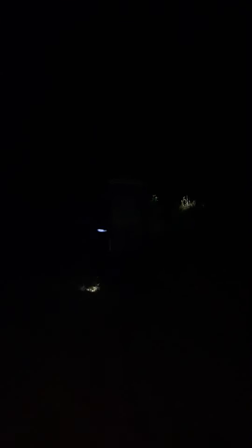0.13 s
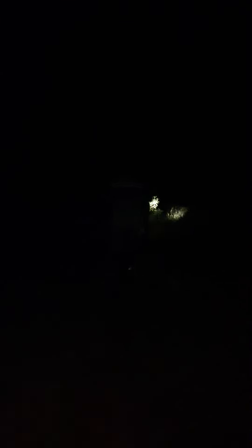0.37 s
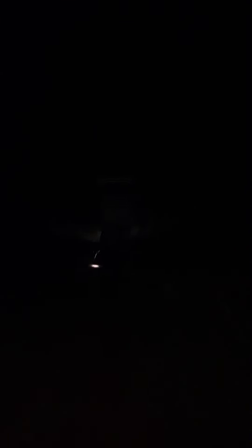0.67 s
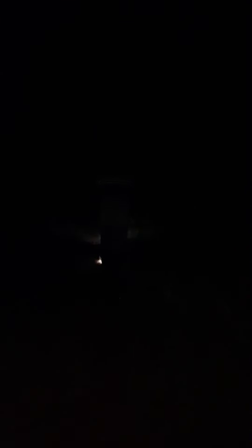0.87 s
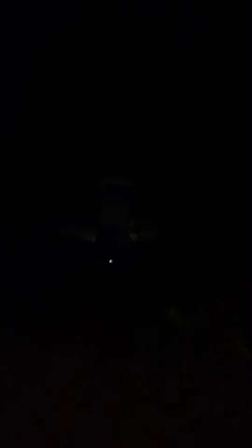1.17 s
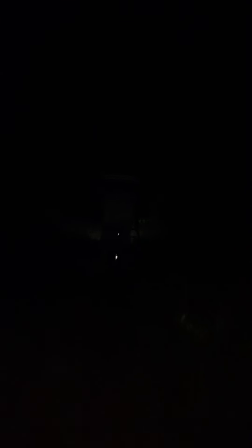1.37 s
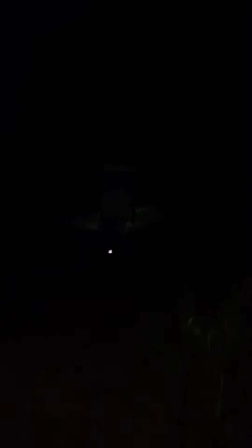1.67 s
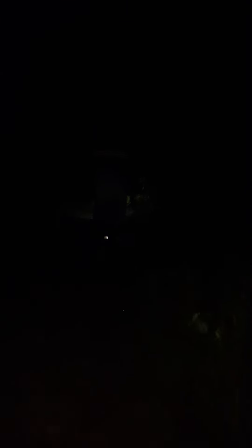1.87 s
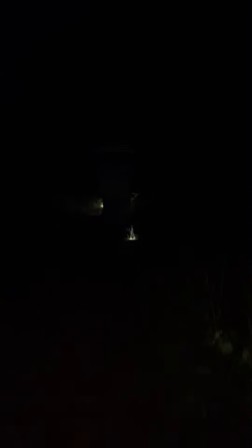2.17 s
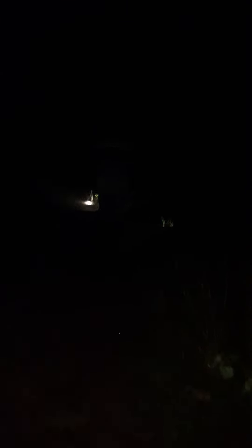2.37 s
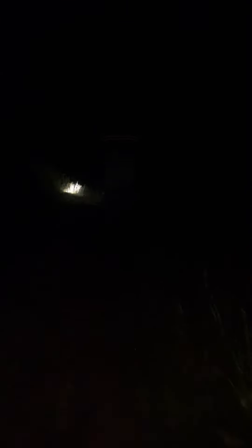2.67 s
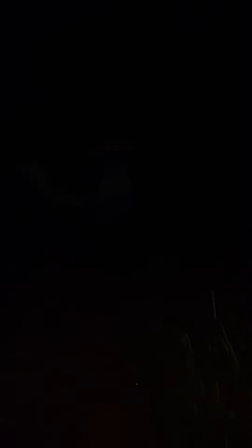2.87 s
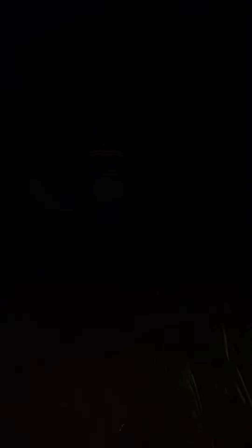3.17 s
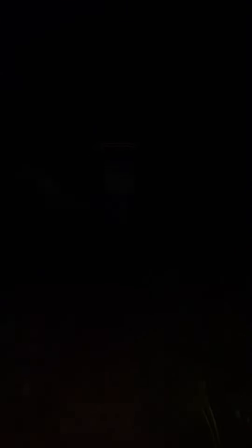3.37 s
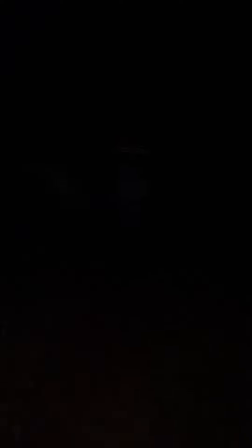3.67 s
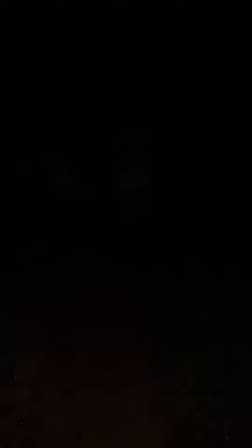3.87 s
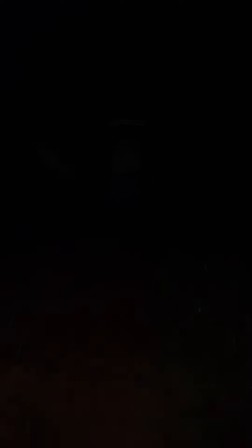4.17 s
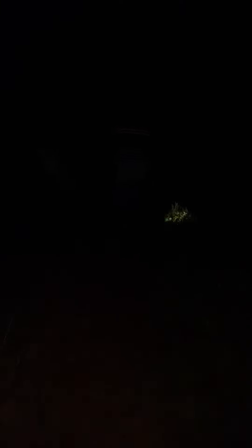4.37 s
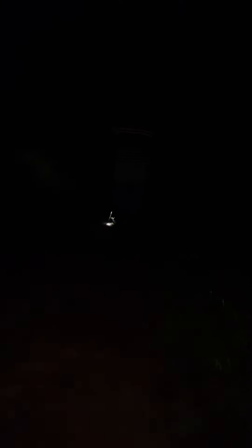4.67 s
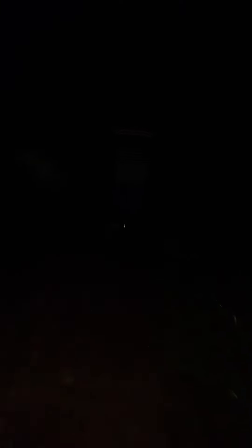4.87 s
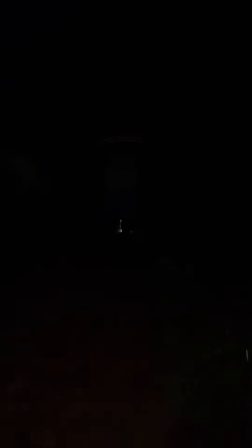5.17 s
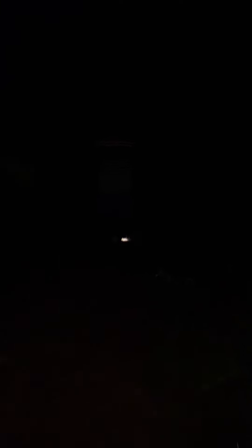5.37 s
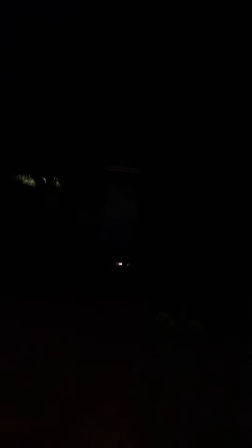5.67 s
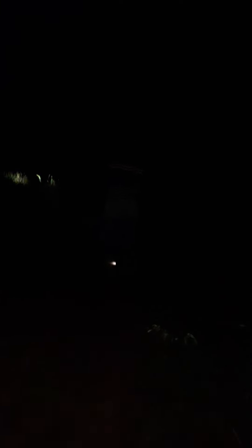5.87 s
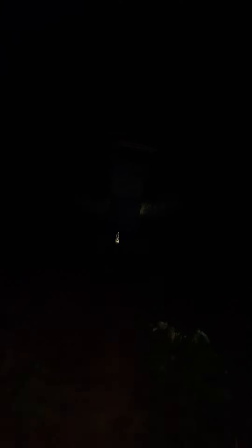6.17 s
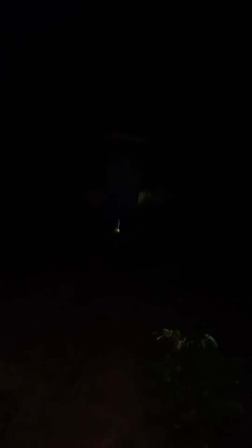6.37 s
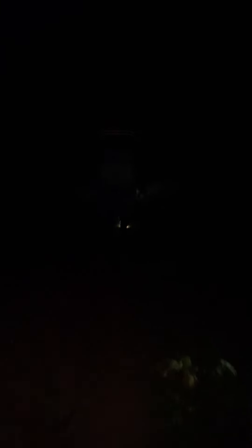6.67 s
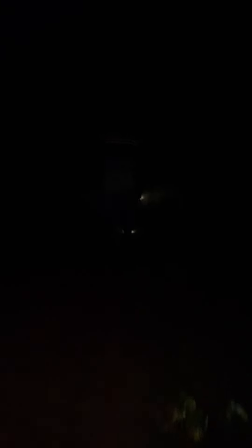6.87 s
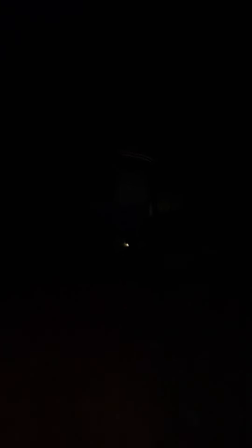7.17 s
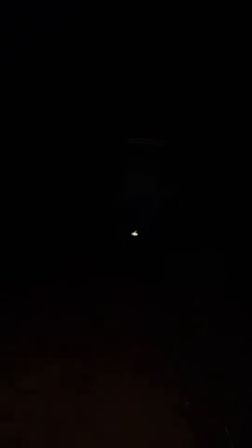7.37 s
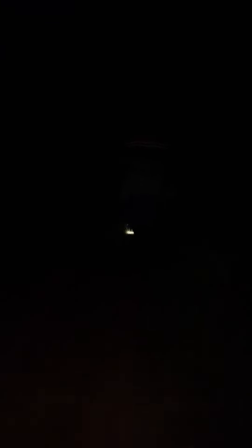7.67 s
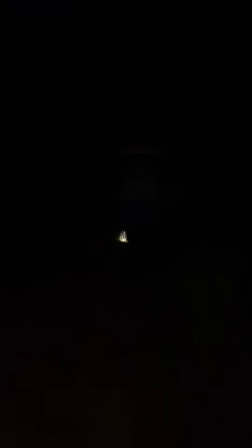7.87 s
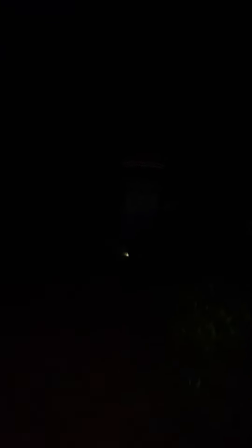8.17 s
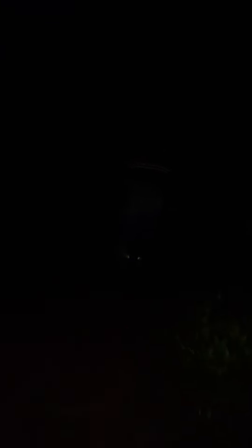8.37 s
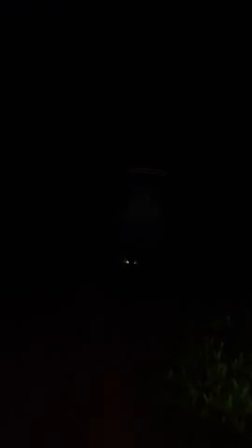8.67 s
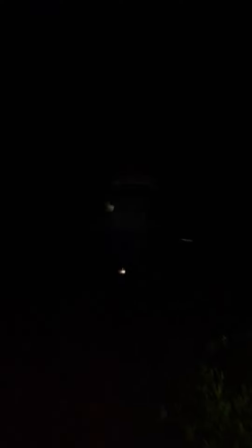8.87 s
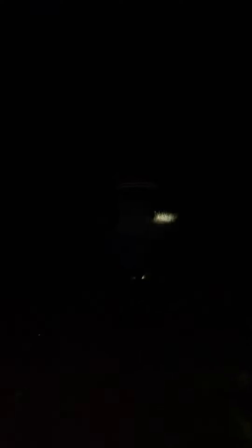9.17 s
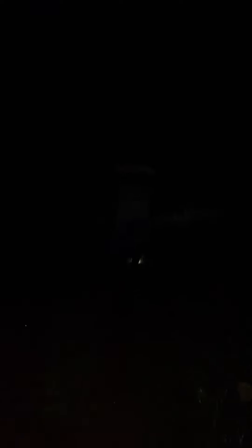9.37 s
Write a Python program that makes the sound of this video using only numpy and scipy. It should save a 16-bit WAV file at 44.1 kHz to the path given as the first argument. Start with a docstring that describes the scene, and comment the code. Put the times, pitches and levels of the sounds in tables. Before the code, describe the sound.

A higher and a lower cricket-like insect answer each other on a dark bush path, fading gradually as a walker's soles slap and thud.

```python
"""Night on a bush path: from the start there is a hush, far trills and, to the right, a buzzy chirp half done.
A second, lower insect answers at once, and the two trade rising chirps; each is a run of ringing wing strokes.
Soon soles slap, a faint far drone drifts in (three times in all), heels thud and grit crunches in noise sprays.
As the walker goes on, the callers fall back: first the higher one sinks, later the lower one too.
The hush and trills are shaped noise, the drone a few sine waves; leaves scatter the chirps and footsteps."""
import sys
import numpy as np
from scipy import signal
from scipy.fft import rfft, irfft
from scipy.io import wavfile
from scipy.ndimage import uniform_filter1d

SR = 44100
rng = np.random.default_rng(int(sys.argv[2]) if len(sys.argv) > 2 else 0)


def materialize(psi):
    """Save the field psi as 16-bit PCM at rate SR to the path in sys.argv[1].

    A 1-D psi becomes a single channel; in a 2-D psi each row is a channel.
    """
    bounded = np.clip(np.atleast_2d(psi).T, -1, 1)
    quanta = np.round(bounded * 32767).astype(np.int16)
    wavfile.write(sys.argv[1], SR, quanta)


N = 420261
TIME = np.arange(N) / SR


def undb(db):
    """Turn decibels into a gain."""
    return 10 ** (np.asarray(db) / 20)


def unit(x):
    """Scale a sound to an average strength (rms) of 1."""
    return x / np.sqrt(np.mean(x ** 2) + 1e-18)


def on_log_axis(rows, hz):
    """Read a table of (f/Hz, value) between its rows, on a log-frequency axis."""
    points, values = np.transpose(rows)
    return np.interp(np.log(hz + 1), np.log(points), values)


def walk(rate):
    """A smooth random wander with a spread near 1; a higher rate (Hz) wanders faster."""
    k = int(SR / rate)
    steps = np.repeat(rng.standard_normal(N // k + 1), k)
    return 1.43 * uniform_filter1d(uniform_filter1d(steps, k), k)[:N]


def pan(db):
    """Left and right gains for a level difference, at constant power; below 0 dB leans right."""
    gains = undb(np.array([[.5], [-.5]]) * db)
    return gains / np.sqrt(np.mean(gains ** 2, axis=0))


def two_ears(shared, opposed, likeness):
    """Mix two noises into left and right; likeness is 1 for the same, 0 for unrelated, -1 for opposite."""
    return shared * np.sqrt(1 + likeness) + opposed * np.sqrt(1 - likeness) * np.array([[1], [-1]])


def add(track, s, sound):
    """Mix a sound into a track at a time in seconds, cutting what falls outside."""
    i = int(s * SR)
    lo, hi = max(i, 0), min(i + sound.shape[-1], N)
    if hi > lo:
        track[..., lo:hi] += sound[..., lo - i:hi - i]


def burst(lo_hz, hi_hz, t, decay_s):
    """A puff of noise between two pitches that dies away."""
    band = signal.butter(2, [lo_hz, hi_hz], "band", fs=SR, output="sos")
    return unit(signal.sosfilt(band, rng.standard_normal(len(t)))) * np.exp(-t / decay_s)


def swell(start, attack_s, hold_s, release_s):
    """A gain that rises, holds and dies away."""
    t = TIME - start
    return np.clip(t / attack_s, 0, 1) * np.exp(-np.maximum(t - attack_s - hold_s, 0) / release_s)


def foliage(x, leaves_db, leaves_t60, far_db, far_t60, shadow_db=0, lag_s=0):
    """Direct sound, quick leaf scatter and a faint tail; the left ear's direct sound can be late and weaker."""
    t = np.arange(SR // 4) / SR
    response = np.zeros((2, len(t)))
    response[0, int(lag_s * SR)], response[1, 0] = undb(shadow_db), 1
    for db, t60 in ((leaves_db, leaves_t60), (far_db, far_t60)):
        scatter = rng.standard_normal(response.shape) * np.exp(-np.log(1000) * t / t60)
        response += undb(db) * unit(scatter) / np.sqrt(len(t))
    response /= np.sqrt(np.sum(response ** 2, axis=1, keepdims=True))
    return signal.fftconvolve(x[None], response, axes=1)


# tone colour of the night's hush, before its overall level is set: (f/Hz, level/dB per Hz)
HUSH_COLOUR = [(25, -13.5), (70, -4), (160, -1), (370, -2.5), (500, 3), (620, -1), (850, -6), (1500, -0.5),
               (3300, -1), (5500, -5.5), (7500, -4.5), (8800, -16), (15500, -13.5)]
# how alike the hush is in both ears: (f/Hz, correlation from -1 to 1)
EAR_LIKENESS = [(50, 0.19), (250, 0.66), (550, 0.79), (1100, 0.51), (2200, -0.24), (4500, 0.43),
                (12000, -0.078)]


def hush(db=-53.0, low_flutter_db=1.9, high_flutter_db=1.05, treble_pan_db=-1.5):
    """The far wash of the night: coloured noise, more restless in the bass than in the treble."""
    f = np.arange(N // 2 + 1) * SR / N
    shared, opposed = rfft(rng.standard_normal((2, N))) * undb(on_log_axis(HUSH_COLOUR, f))
    ears = two_ears(shared, opposed, np.clip(on_log_axis(EAR_LIKENESS, f), -1, 1))
    bass = 1 / (1 + (f / 600) ** 4)
    low = irfft(ears * bass, N) * undb(low_flutter_db * walk(14))
    high = irfft(ears * (1 - bass), N) * undb(high_flutter_db * walk(10)) * pan(treble_pan_db)
    return undb(db) * unit(low + high)


def far_trill(hz, width_hz, beat_hz, depth, pan_db, likeness):
    """Many far insects of one kind: their ring smears into a narrow band that throbs with the wing beat."""
    f = np.arange(N // 2 + 1) * SR / N
    band = irfft(rfft(rng.standard_normal((2, N))) / (1 + ((f - hz) / width_hz) ** 4), N)
    ears = two_ears(band[0], band[1], likeness)
    beat = np.cos(2 * np.pi * np.cumsum(beat_hz * (1 + 0.0233 * walk(9))) / SR)
    flicker = undb(1.0 * walk(12))
    return unit(ears * np.exp(depth * beat) * flicker) * pan(pan_db)


# swells of the lowest far trill: (start t/s, peak level/dB of the swell alone)
LOW_TRILL_SWELLS = [(.2, -52), (.7, -60.5), (1.15, -60), (1.55, -59.5), (2.27, -58.5), (2.84, -62),
                    (5.02, -64)]


def chorus(steady_db=-61, attack_s=0.027, hold_s=0.07, release_s=0.19):
    """Four far trills, low to high; the lowest swells now and then, the third is the callers' own kind."""
    swells = sum(undb(db) * swell(s, attack_s, hold_s, release_s) for s, db in LOW_TRILL_SWELLS)
    low = far_trill(hz=2137, width_hz=225, beat_hz=148.8, depth=0.29, pan_db=-7.0, likeness=0.55)
    low = low * np.hypot(undb(steady_db), swells)
    middle = far_trill(hz=4748, width_hz=355, beat_hz=30.7, depth=0.26, pan_db=-5.5, likeness=0) * undb(-57.5)
    kin = far_trill(hz=6770, width_hz=430, beat_hz=107, depth=0.3, pan_db=-14, likeness=0) * undb(-52.5)
    high = far_trill(hz=9970, width_hz=130, beat_hz=87, depth=0.5, pan_db=-29, likeness=0) * undb(-75.5)
    return low + middle + kin + high


def stroke(hz, length_s, sag):
    """One scrape of the wing, sagging in pitch: three partials of equal energy, the octave ringing longest."""
    u = np.linspace(0, 1, int(length_s * SR))  # share of the stroke gone by
    phase = 2 * np.pi * hz * length_s * (u + sag * (u - u ** 2))
    shapes = np.sin(np.pi * u ** .9) ** np.array([[5], [2], [4]])
    partials = shapes * np.sin(np.outer([1, 2, 3], phase))
    return partials / np.sqrt(np.sum(partials ** 2, axis=1, keepdims=True))


# every chirp starts with slack wings: time to tighten (s), share of pitch and level (dB) missing at first
SLACK_S, SLACK_DROP, ONSET_DB = 0.016, 0.069, -15
# shares of the chirp taken by the opening accent and the release; level lost in the release (dB)
ACCENT_SHARE, RELEASE_SHARE, RELEASE_DB = 0.48, 0.088, 7.5
# longer chirps climb more slowly: usual length (s), strength (0 = not at all, 1 = same end pitch)
USUAL_CHIRP_S, CLIMB_SPREAD = 0.22, 0.55


def chirp(seconds, level_db, accent_db, wing_hz, climb_hz_per_s, beat_hz, early_s, late_s, sag,
          back_lag, back_db=-5.5, pitch_scatter=0.0091):
    """Wing beats that gain pitch and force, then ease off, shorten and climb, with weaker back strokes between."""
    count = int(1.04 * seconds * beat_hz) + 1
    out = np.zeros((3, int(seconds * SR) + SR // 10))
    climb = climb_hz_per_s * (USUAL_CHIRP_S / seconds) ** CLIMB_SPREAD
    for k, chance in enumerate(rng.standard_normal((count, 6))):
        s = k / beat_hz
        u = s / seconds  # share of the chirp gone by
        slack = np.exp(-s / SLACK_S)
        hz = wing_hz * (1 - SLACK_DROP * slack) + climb * s
        accent = accent_db * np.exp(-(u / ACCENT_SHARE) ** 2)
        release = max(u - 1 + RELEASE_SHARE, 0) / RELEASE_SHARE
        db = level_db + ONSET_DB * slack + accent - RELEASE_DB * release
        length = np.interp(u, [.2, .5], [early_s, late_s]) * np.exp(.12 * chance[0])
        main = (s + .00006 * chance[1], hz * (1 + pitch_scatter * chance[2]), db + chance[3])
        back_s = s + (back_lag + .2 * u + .04 * chance[4]) / beat_hz
        back = (back_s, hz, db + back_db - 7 * u + 2 * chance[5])
        for at, pitch, size_db in (main, back):
            sound = stroke(pitch, length, sag)
            i = max(int(at * SR), 0)
            out[:, i:i + sound.shape[1]] += undb(size_db) * sound * np.sqrt(SR / beat_hz)
    return out


# the callers' colour as the walker passes, against the octave and before the beam and overtone trims:
# (t/s, fundamental level/dB, third partial level/dB)
CALL_COLOUR = [(0, -4.5, -29), (2.4, -9.5, -21.5), (3.3, -9.5, -17), (5.9, -6.5, -17.5), (6.4, -15.5, -39)]
# the loudest chirps catch the octave's beam: above this held level (dB) the fundamental loses a share of each dB
BEAM_DB, BEAM_SHARE = -44.5, 0.63


def caller(chirps, beat_hz, leaves_db, overtone_db, pan_db, gain_db, **wings):
    """One insect: the octave carries the song and beams to one side, the fundamental spreads more evenly."""
    out = np.zeros((2, N))
    times, *colours = np.transpose(CALL_COLOUR)
    for start, seconds, level_db, accent_db in chirps:
        beat = beat_hz * (1 + .003 * rng.standard_normal())
        first, octave, third = chirp(seconds, level_db, accent_db, beat_hz=beat, **wings)
        first_db, third_db = (np.interp(start, times, c) for c in colours)
        first_db -= BEAM_SHARE * max(level_db - BEAM_DB, 0)
        # the walker moves on, so every chirp comes through other leaves
        upper = octave + undb(third_db + overtone_db) * third
        song = foliage(upper, leaves_db, .03, -12, .25, shadow_db=-6, lag_s=.00012)
        fundamental = foliage(first, leaves_db - 2, .03, -9, .3, lag_s=.00012)
        add(out, start, song * pan(pan_db) + undb(first_db) * fundamental * pan(-4.5))
    return undb(gain_db) * out


# chirps of the higher caller, before its gain: (start t/s, length t/s, held level/dB, opening accent level/dB)
HIGHER_CHIRPS = [(-.18, .27, -38.5, 4), (.291, 0.25, -35, 6), (.76, .26, -39, 4), (1.225, 0.26, -36, 9),
                 (1.735, 0.26, -39.5, 0.5), (2.225, 0.26, -38, 4), (2.725, 0.28, -42, 3.5),
                 (3.198, 0.26, -45.5, 10), (3.67, 0.26, -45.5, 10), (4.138, .24, -44.5, 8.5),
                 (4.605, 0.25, -41.5, 6), (5.14, 0.26, -42, 2.5), (5.635, 0.26, -41.5, 2),
                 (6.13, 0.13, -50, 5.5), (6.6, 0.13, -48.5, 8), (7.11, 0.15, -49.5, 5),
                 (7.63, 0.14, -52.5, 2), (8.17, 0.17, -50.5, -2), (8.78, 0.15, -54, 0),
                 (9.36, 0.16, -57.5, 4)]


def higher_caller():
    """The insect with the higher ring and the quicker wing beat; its strokes are short."""
    return caller(HIGHER_CHIRPS, beat_hz=101.8, leaves_db=-4.5, overtone_db=-13, pan_db=-11.5, gain_db=2.0,
                  wing_hz=3282, climb_hz_per_s=1690, early_s=0.0039, late_s=0.0033, sag=0.12, back_lag=.42)


# chirps of the lower caller, before its gain: (start t/s, length t/s, held level/dB, opening accent level/dB)
LOWER_CHIRPS = [(.06, 0.2, -46, 8), (.515, 0.19, -38.5, 2), (.955, 0.17, -39.5, 1.5),
                (1.485, 0.19, -39.5, 1), (1.95, .18, -38.5, 0), (2.465, .19, -34.5, 0.5),
                (2.925, 0.2, -37, 4.5), (3.405, .17, -36.5, 2), (3.865, 0.18, -36.5, 1.5),
                (4.34, 0.19, -38.5, 2), (4.86, 0.19, -37.5, 1.5), (5.36, .18, -41, 0.5),
                (5.81, 0.206, -42, 2), (6.32, 0.22, -40.5, -1.5), (6.79, .27, -43, -1.5),
                (7.304, .26, -41, 1.5), (7.82, 0.32, -46.5, 5), (8.38, 0.3, -43.5, 0),
                (8.98, .33, -51, 6.5)]


def lower_caller():
    """The answering insect, deeper in the thicket: lower ring, longer strokes and more scatter from leaves."""
    return caller(LOWER_CHIRPS, beat_hz=98.5, leaves_db=-1, overtone_db=-20, pan_db=-11.0, gain_db=0.5,
                  wing_hz=3036, climb_hz_per_s=1680, early_s=.0056, late_s=0.0047, sag=0.099, back_lag=0.33)


# sandal slaps, mostly about 1.2 s apart, with one long gap and one close pair, before the common gain:
# (t/s, peak level/dB)
SOLE_SLAPS = [(0.233, -40), (1.385, -40), (2.596, -43), (5.115, -46), (6.023, -48), (6.329, -46),
              (7.524, -42.5), (8.745, -46.5)]
# what a sole rings with, before each slap's pitch scatter: (f/Hz, level/dB, time to fall by 60 dB t/s)
SOLE_RING = [(808, 3, 0.037), (960, -5, 0.026), (1365, 3.5, 0.041), (1990, -13, 0.043)]


def sole_slaps(gain_db=3.0, crack_db=2):
    """Soles slap with a crack of noise and a short hollow ring of dying sine waves."""
    out, t = np.zeros(N), np.arange(SR // 8) / SR
    for s, db in SOLE_SLAPS:
        slap = undb(crack_db) * burst(650, 1900, t, .005)
        for hz, ring_db, t60 in SOLE_RING:
            pitch = hz * (1 + 0.057 * rng.standard_normal())
            slap += undb(ring_db) * np.sin(2 * np.pi * pitch * t) * np.exp(-np.log(1000) * t / t60)
        add(out, s, slap * undb(db + gain_db) / np.max(abs(slap)))
    return out


# the far drone drifts in three times: (start t/s, hold t/s, level/dB)
DRONE_SWELLS = [(0.253, 0.25, -68), (1.74, 0.91, -70.5), (3.44, 0.62, -66)]
# its partials, before their levels wander: (multiple of the base pitch, level/dB)
DRONE_TONES = [(2, -3), (3, -7), (4, -10.5)]


def drone(hz=87.3, attack_s=0.037, release_s=0.18):
    """A nearly steady far drone: a few sine waves on one base pitch that drift in and out of hearing."""
    phase = 2 * np.pi * np.cumsum(hz * (1 + .005 * walk(2))) / SR
    gain = sum(undb(db) * swell(s, attack_s, hold_s, release_s) for s, hold_s, db in DRONE_SWELLS)
    tone = sum(undb(db + walk(3.5)) * np.sin(k * phase) for k, db in DRONE_TONES)
    return gain * unit(tone)


# soft footfalls on earth, before the common gain: (t/s, peak level/dB, f/Hz)
EARTH_THUDS = [(0.698, -54, 268), (1.149, -49.5, 249), (1.666, -53, 338), (2.294, -50, 185),
               (2.866, -51, 161), (5.157, -50, 242), (5.282, -50, 145), (5.817, -45, 300),
               (6.289, -51.5, 140), (8.184, -51, 161), (9.311, -46.5, 163)]


def earth_thuds(gain_db=2, decay_s=0.0053):
    """Heels press dull thuds out of the earth: a quickly dying low tone and a puff of low noise."""
    out, t = np.zeros(N), np.arange(SR // 8) / SR
    for s, db, hz in EARTH_THUDS:
        tone = np.sin(2 * np.pi * hz * t) * np.exp(-t / decay_s)
        thud = t * (tone + burst(90, 400, t, decay_s))  # the factor t softens the start
        add(out, s, thud * undb(db + gain_db) / np.max(abs(thud)))
    return out


def footsteps():
    """Slaps and thuds together, scattered by the leaves around the path."""
    steps = sole_slaps() + earth_thuds()
    return foliage(steps, leaves_db=-5, leaves_t60=0.014, far_db=-9.5, far_t60=0.2)[:, :N]


# grit crunching underfoot, before the common gain and the fade shape: (t/s, level/dB)
GRIT_CRUNCHES = [(0.8819, -50), (2.077, -50), (2.8419, -45), (3.207, -44.5), (4.3869, -49), (5.0499, -52),
                 (6.0806, -50), (6.6598, -50), (7.2424, -51), (7.8247, -50), (9.1058, -49)]


def grit(gain_db=-2, rise_s=0.0029, crunch_s=0.019):
    """A short spray of tiny clicks, made of spiky noise, as sand gives way."""
    out, t = np.zeros((2, N)), np.arange(SR // 8) / SR
    shape = (1 - np.exp(-t / rise_s)) * np.exp(-t / crunch_s)
    for s, db in GRIT_CRUNCHES:
        grains = unit(rng.standard_normal((2, len(t))) * rng.exponential(size=len(t)))
        add(out, s, grains * shape * undb(db + gain_db))
    return out


def scene():
    """Hush and far chorus, two near callers, the walker's steps, a far drone and the grit."""
    night = hush() + chorus()
    callers = higher_caller() + lower_caller()
    return night + callers + footsteps() + drone() + grit()


def record(dry):
    """The recorder cuts the top: a steep filter removes what lies above 15.8 kHz."""
    return signal.sosfilt(signal.ellip(10, .2, 70, 15800, fs=SR, output="sos"), dry)


dry = scene()
out = record(dry)
materialize(out)
```